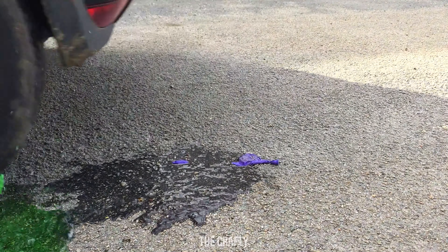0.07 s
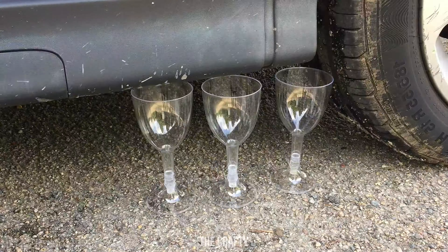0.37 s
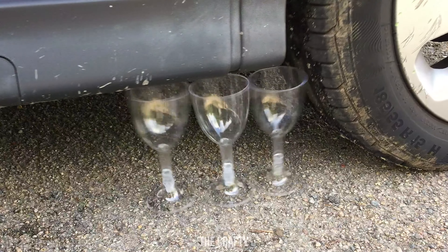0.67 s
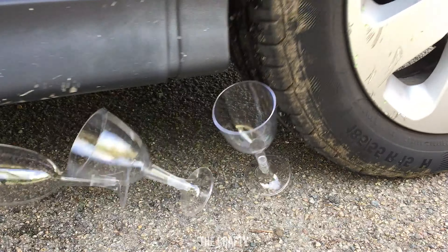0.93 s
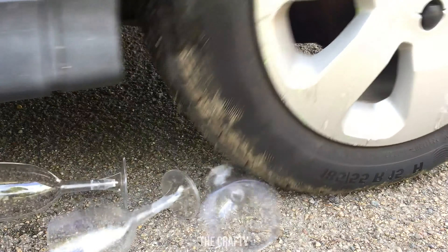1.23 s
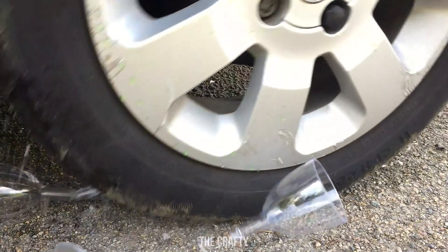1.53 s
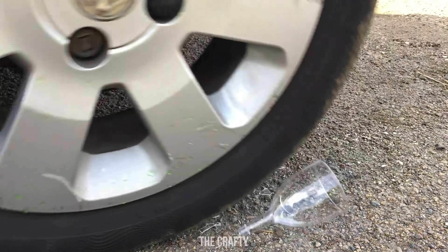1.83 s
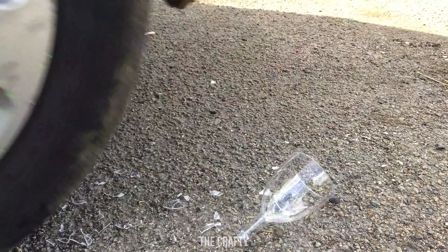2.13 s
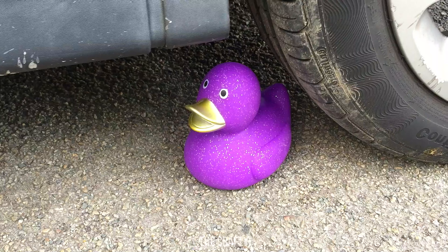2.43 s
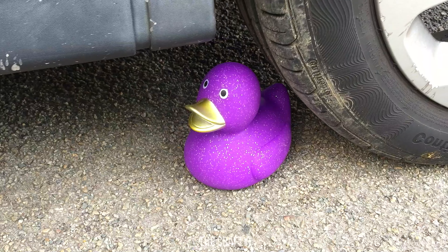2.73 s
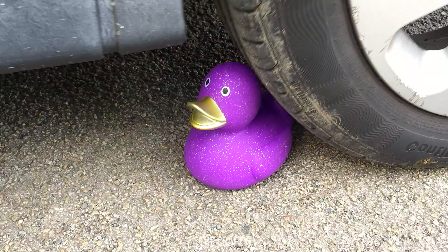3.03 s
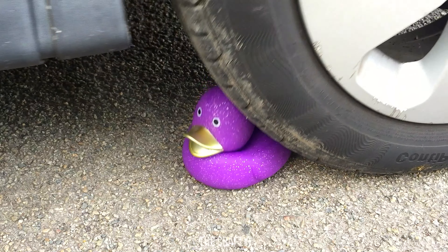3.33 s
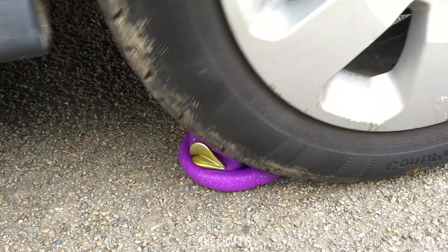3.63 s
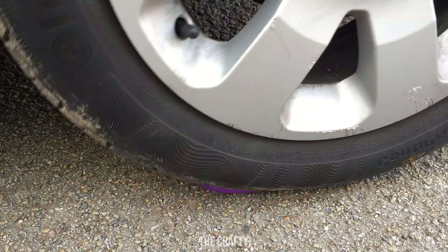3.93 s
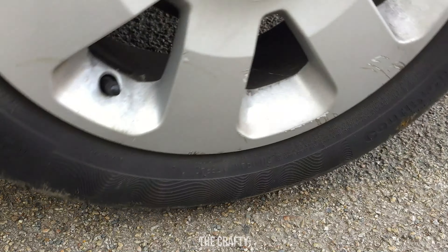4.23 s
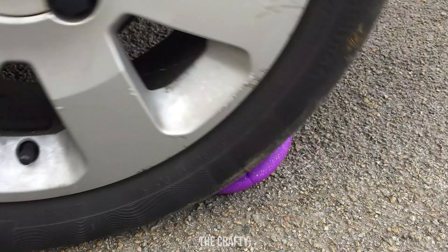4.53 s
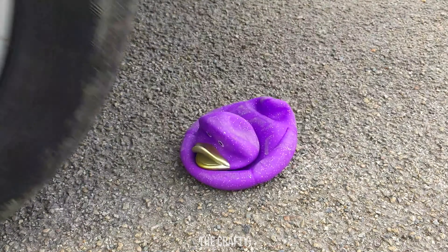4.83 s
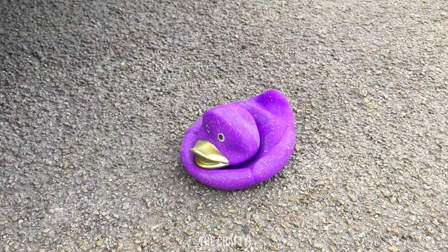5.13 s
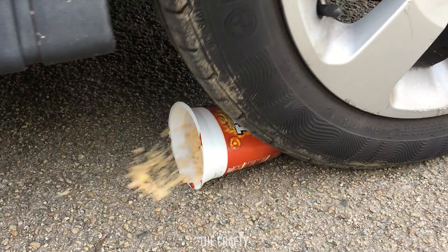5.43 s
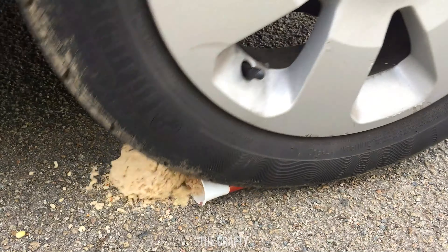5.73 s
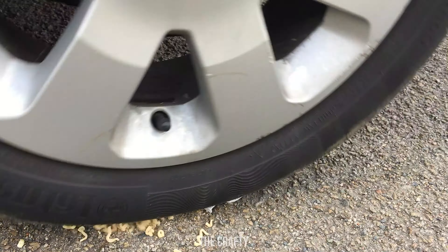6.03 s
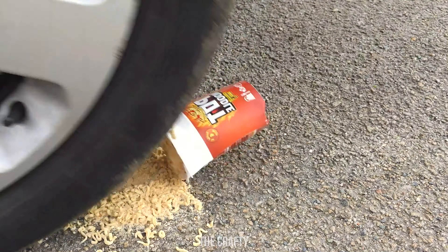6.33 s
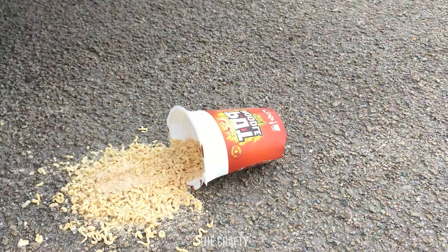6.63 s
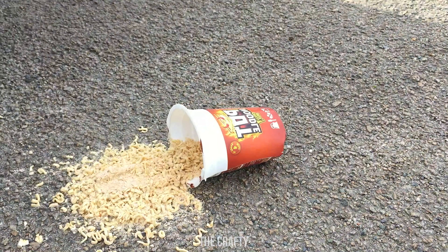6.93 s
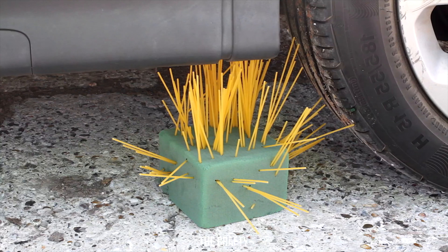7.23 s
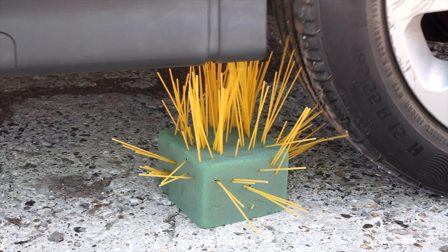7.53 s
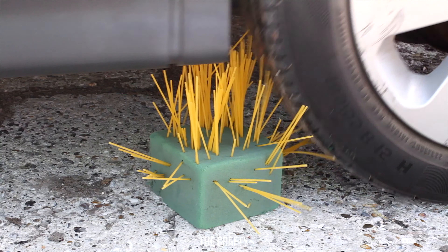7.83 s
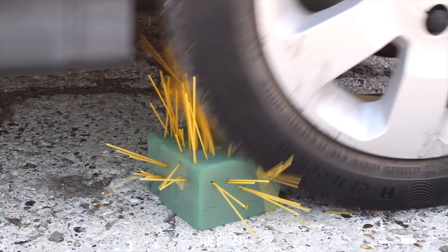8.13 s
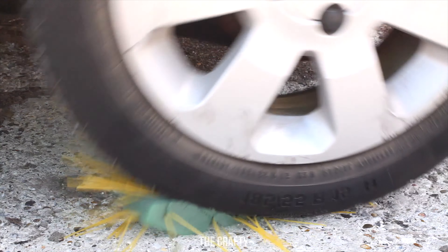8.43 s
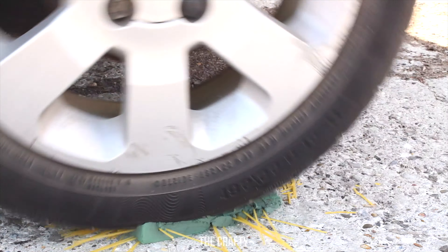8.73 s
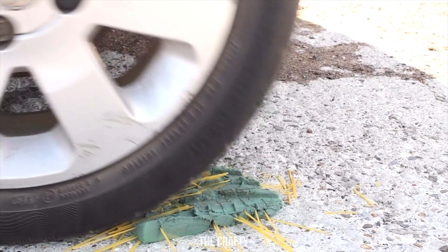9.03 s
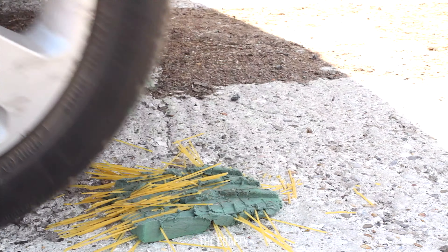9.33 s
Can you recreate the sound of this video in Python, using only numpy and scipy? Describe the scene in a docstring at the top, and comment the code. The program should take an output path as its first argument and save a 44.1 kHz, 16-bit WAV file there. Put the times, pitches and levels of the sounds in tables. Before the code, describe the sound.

A car tyre rolls over clinking, cracking plastic glasses, a whistling rubber duck, a crackling noodle pot and snapping spaghetti while the engine rumbles.

```python
"""A car creeps over things laid on asphalt, heard from beside the tyre, its engine idling over the grit.
First plastic wine glasses clink, topple and burst into splinters. Next a rubber duck whistles as its air
is squeezed out and sucked back in. Then a pot of dry noodles crackles, pops and springs back.
Last the engine revs hard, and spaghetti stuck in a fizzing foam block snaps and crunches."""
import sys
import numpy as np
from scipy import signal
from scipy.fft import rfft, irfft
from scipy.io import wavfile

SR = 44100
rng = np.random.default_rng(int(sys.argv[2]) if len(sys.argv) > 2 else 0)


def wav_out(sig):
    """Save sig, one row per channel (or a flat mono array), as 16-bit PCM at SR to the path in sys.argv[1]."""
    wavfile.write(sys.argv[1], SR, np.round(np.clip(np.atleast_2d(sig).T, -1, 1) * 32767).astype(np.int16))


N = 418950
TIME = np.arange(N) / SR

# mid-heavy colour of the engine clatter and the outdoor air: (frequency [Hz], relative level [dB])
CLATTER_COLOUR = [(100, -12), (300, -4.5), (450, -3), (700, 1.5), (950, -0.5), (1180, -1), (1500, -4),
                  (3500, -12), (6000, -15.5), (10000, -24), (16000, -26)]
# grit and splinters shifting under the tyre: (time [s], relative level [dB])
GRIT_LEVEL = [(0, -49), (.55, -36), (1.2, -32.5), (1.4, -43.5), (1.62, -34), (2.0, -45.5), (2.3, -47),
              (2.48, -37)]
# high modes of a glass, rung by a hard knock: (frequency [Hz], relative level [dB], t60 [s])
EDGE_MODES = [(3370, -24, 0.069), (3770, -13.5, 0.079), (3800, -36, 0.049), (5540, -8.5, 0.045),
              (6800, -10.5, 0.048)]


def from_db(db):
    """Decibels to gain."""
    return 10 ** (np.asarray(db) / 20)


def rms_one(x):
    """Scale to unit rms."""
    return x / np.sqrt(np.mean(x ** 2) + 1e-20)


def in_time(*tables):
    """Each column after time in the joined tables, as a curve over all samples."""
    times, *columns = np.vstack(tables).T
    return [np.interp(TIME, times, column) for column in columns]


def during(rows):
    """A gate, open from the first row's time to the last, with 4 ms fades."""
    return np.clip(np.minimum(TIME - rows[0][0], rows[-1][0] - TIME) / .004 + 1, 0, 1)


def drift(rate_hz, size=N):
    """A smooth random wander of about unit rms."""
    pole = np.exp(-40 * np.pi * rate_hz / SR)
    noise = rng.standard_normal(size // 20 + 2002)
    slow = signal.lfilter([1], [1, -2 * pole, pole * pole], noise)[2000:]
    return np.interp(np.arange(size) / 20, np.arange(len(slow)), rms_one(slow))


def coloured(x, spectrum, size=4096):
    """Minimum-phase EQ of unit energy, shaped by rows of (frequency [Hz], relative level [dB])."""
    hz, db = np.transpose(spectrum)
    grid_hz = np.maximum(np.arange(size // 2 + 1) * SR / size, 1)
    gain = from_db(np.interp(np.log(grid_hz), np.log(hz), db))
    cepstrum = irfft(np.log(gain))
    cepstrum[1:size // 2] *= 2
    cepstrum[size // 2 + 1:] = 0
    response = irfft(np.exp(rfft(cepstrum)))
    return signal.oaconvolve(x, response / np.linalg.norm(response))[:N]


def add(track, s, sound):
    """Mix a short sound in at time s."""
    start = int(s * SR)
    track[start:start + len(sound)] += sound[:N - start]


def decay(t60):
    """A quarter second of exponential decay."""
    return from_db(-60 * TIME[:SR // 4] / t60)


def ring(hz, t60):
    """One struck mode."""
    return np.sin(2 * np.pi * hz * TIME[:SR // 4]) * decay(t60)


def crack(t60, tail_db, tail_t60, rise_s=.00025):
    """A sharp burst with a weaker tail scattered under the car."""
    attack = 1 - np.exp(-TIME[:SR // 4] / rise_s)
    return rng.standard_normal(SR // 4) * attack * (decay(t60) + from_db(tail_db) * decay(tail_t60))


def grains(per_s, spread_db, clump_db):
    """Tiny fractures of uneven size that come in clumps; rms 1."""
    sizes = from_db(spread_db * np.minimum(rng.exponential(1, N), 4)) * rng.choice([-1, 1], N)
    hits = rng.random(N) < per_s / SR
    return rms_one(sizes * hits * from_db(clump_db * drift(18)))


def surge(s, rise_s, fall_s, drop_db=20):
    """A swell that peaks at s and is drop_db down at the ends of its rise and fall."""
    distance = np.maximum((s - TIME) / rise_s, (TIME - s) / fall_s)
    return from_db(-drop_db * np.minimum(distance, 10))


def whistle(rows, waver, flutter_db):
    """A gliding tone that wavers in pitch and flutters in level."""
    s, hz, db = np.transpose(rows)
    t = TIME[int(s[0] * SR):int(s[-1] * SR)]
    pitch_hz = np.interp(t, s, hz) * (1 + waver * drift(490, size=len(t)))
    phase = 2 * np.pi * np.cumsum(pitch_hz) / SR
    fade = np.clip(np.minimum(t - s[0], s[-1] - t) / .003, 0, 1)
    level = from_db(np.interp(t, s, db) + flutter_db * drift(105, size=len(t)))
    tone = np.zeros(N)
    add(tone, s[0], np.sqrt(2) * np.sin(phase) * fade * level)
    return tone


def outdoors():
    """A faint, steady bed of outdoor air."""
    return from_db(-53.5) * coloured(rng.standard_normal(N), CLATTER_COLOUR)


def exhaust_orders(phase, firing_hz, upper_db, half_db, hop=64):
    """Whole and half multiples of the firing tone, each coloured by the pipe as it sweeps through."""
    # the exhaust's resonances: (frequency [Hz], gain [dB])
    pipe_response = [(24, -34.5), (40, 5.5), (60, -6), (72, -8.5), (85, -5.5), (110, -7.5), (160, 2),
                     (220, -6), (320, -3), (600, -4)]
    pipe_hz, pipe_db = np.transpose(pipe_response)
    fall_db_per_octave = 12.5
    firing_hz, upper_db, half_db = (curve[::hop] for curve in (firing_hz, upper_db, half_db))
    tones = 0
    for order in np.r_[1, 3:15] / 2:
        db = upper_db - fall_db_per_octave * max(np.log2(order / 2), 0)
        if order % 1:  # unequal cylinders add half orders
            db = db + half_db
        db = db + np.interp(np.log(order * firing_hz), np.log(pipe_hz), pipe_db)
        amplitude = np.repeat(np.sqrt(2) * from_db(db), hop)[:N]
        tones = tones + amplitude * np.cos(order * phase + order * order)
    return tones * from_db(2.3 * drift(20))


def engine():
    """Exhaust tones and growl, with rumble and clatter that throb at each firing."""
    # engine speed and heard level for each pass; the level ducks under the bursting glasses, then recovers:
    # (time [s], firing rate [Hz], level above idle [dB], firing tone [dB])
    speed_and_level = [
        [(0, 40, -18, -43), (.15, 41.5, -2.5, -39), (.42, 38, -5.5, -47)],
        [(.44, 48, 4, -39.5), (1.25, 50, 2, -39), (1.35, 47, -26, -68), (2.0, 45, -26, -67),
         (2.48, 45, -6.5, -43)],
        [(2.5, 46, -2.5, -41), (2.95, 57.3, -1.5, -38), (3.5, 51, -9, -48.5), (3.8, 42.5, -0.5, -46),
         (4.0, 57.5, 5, -29), (4.2, 67.6, 4.5, -44.5), (4.5, 86, 0.5, -37.5), (4.78, 70.5, 3, -40),
         (4.95, 62, -6, -56)],
        [(5.22, 39, -1.5, -56), (5.85, 42.5, 2, -46), (6.15, 69, 6.5, -41), (6.45, 61, 4, -35),
         (6.75, 63.5, 3, -32), (7.02, 62.5, 3, -33)],
        [(7.04, 32, 14, -48), (7.25, 47.6, 19, -26), (7.412, 63.6, 20, -29), (7.53, 80.4, 22, -31),
         (7.662, 100, 23, -27.5), (7.766, 106, 18.5, -29), (7.895, 102, 16, -22), (7.95, 113, 0, -34),
         (8.12, 83, 0, -49), (8.39, 73, 1.5, -43), (8.7, 45.8, 1, -38), (9.5, 35.8, 10.5, -36)],
    ]
    # the balance at idle, each pass heard from its own spot:
    # (start [s], upper orders [dB], half orders against whole ones [dB], rumble [dB], clatter [dB])
    idle_mix = [(0, -34, -4.5, -50, -45.5), (.43, -37, -23, -51, -48.5), (2.49, -43, 1, -50.5, -52),
                (5.209, -45, -0.5, -48, -76), (7.031, -38.5, -56, -38, -38.5)]
    # ring of the pipe and the space under the car: (frequency [Hz], relative level [dB])
    growl_colour = [(150, -25.5), (300, 0), (400, -1), (500, 3.5), (590, -1.5), (680, 6), (760, -1),
                    (850, 3.5), (1100, -3), (2000, -11), (5000, -41.5)]
    # the engine's low end: (frequency [Hz], relative level [dB])
    rumble_colour = [(20, -20), (45, -7), (90, -3.5), (170, 1), (280, 0.5), (450, -20), (1000, -38.5),
                     (4000, -77)]
    growl_follows, rumble_follows, clatter_follows = 1.36, .63, .56  # dB per dB of engine level
    idle_hz, deep_hz = 50, 83
    firing_spread_db, clatter_db_per_octave = 2.5, 7.5

    firing_hz, level_db, tone_db = in_time(*speed_and_level)
    passes = np.array(idle_mix)
    current_pass = np.searchsorted(passes[1:, 0], TIME)
    upper_db, half_db, rumble_db, clatter_db = passes[current_pass, 1:].T
    firings = np.cumsum(firing_hz * (1 + .0045 * drift(11))) / SR
    phase = 2 * np.pi * firings
    throb = np.cos(phase)
    tone = np.sqrt(2) * from_db(tone_db) * throb

    # exhaust pulses harden faster than the engine's level rises
    pulses = np.diff(np.floor(firings), prepend=0)
    pulses = rms_one(pulses * from_db(firing_spread_db * rng.standard_normal(N)))
    growl = from_db(-59 + growl_follows * level_db) * coloured(pulses, growl_colour)

    # the deepest rumble ignores the engine's swings in level
    low_noise = coloured(rng.standard_normal(N) * (1 + .22 * throb), rumble_colour)
    deep = signal.sosfilt(signal.butter(4, deep_hz, "low", fs=SR, output="sos"), low_noise)
    body = signal.sosfilt(signal.butter(4, deep_hz, "high", fs=SR, output="sos"), low_noise)
    rumble = from_db(rumble_db) * (from_db(-2.5) * deep + from_db(rumble_follows * level_db) * body)

    speed_db = clatter_db_per_octave * np.log2(firing_hz / idle_hz)
    clatter_gain = from_db(clatter_db + clatter_follows * level_db + speed_db)
    clatter = clatter_gain * coloured(rng.standard_normal(N) * (1 + .15 * throb), CLATTER_COLOUR)
    return tone + exhaust_orders(phase, firing_hz, upper_db + level_db, half_db) + growl + rumble + clatter


def tyre():
    """The tread grinds over grit and splinters and knocks dully; the wheel squeaks once."""
    # single stones and splinters clicking under the tread: (time [s], level [dB])
    stone_clicks = [(0.34, -20.5), (.369, -21), (1.634, -13), (1.893, -21), (1.898, -22), (1.941, -19),
                    (2.036, -19.5), (2.348, -16.5), (2.428, -25)]
    # the tread knocking and scuffing on the ground: (time [s], level [dB], t60 [s])
    tread_knocks = [(2.089, -41, .07), (3.571, -37, 0.068), (4.768, -26, 0.042), (5.115, -41, 0.03),
                    (5.258, -32.5, 0.031), (8.679, -29, 0.67), (8.775, -25, 0.18), (8.80, -18, 0.34),
                    (9.105, -25, 0.096), (9.129, -21.5, 0.042)]
    # a faint squeak from the wheel: (time [s], pitch [Hz], level [dB])
    wheel_squeak = [(4.2, 1175, -69), (4.24, 1190, -38), (4.28, 1200, -66), (4.34, 1190, -43),
                    (4.4, 1171, -52), (4.46, 1180, -49), (4.6, 1175, -55)]
    grit_db, = in_time(GRIT_LEVEL)
    grit = from_db(grit_db - 10) * grains(per_s=500, spread_db=3, clump_db=3)
    for s, db in stone_clicks:
        add(grit, s, from_db(db) * crack(t60=.0019, tail_db=-20, tail_t60=.046))
    grit = coloured(grit, [(300, -4), (2000, -4.5), (6000, -13), (16000, -16)])
    knocks = np.zeros(N)
    for s, db, t60 in tread_knocks:
        add(knocks, s, from_db(db) * rng.standard_normal(SR // 4) * decay(t60))
    knocks = coloured(knocks, [(100, -2), (350, 6.5), (1200, 2.5), (2500, -8.5), (6000, -63), (16000, -47)])
    return grit * during(GRIT_LEVEL) + knocks + whistle(wheel_squeak, waver=.038, flutter_db=-4.5)


def struck(modes):
    """Each knock lands on another spot and shares its strength differently among the modes."""
    spread_db, spread_pitch = 4, .009
    chance = rng.normal(0, [spread_db, spread_pitch], (len(modes), 2))
    return sum(from_db(db + uneven_db) * ring(hz * (1 + detune), t60)
               for (hz, db, t60), (uneven_db, detune) in zip(modes, chance))


def bowl_ring(hz):
    """A soft knock rings only the low modes of a glass's bowl."""
    # the bowl's modes: (ratio to its pitch, relative level [dB], t60 [s])
    bowl_modes = [(.505, -18, 0.092), (0.754, -23.5, 0.14), (1.001, -0.5, 0.11), (1.13, 1.5, 0.03),
                  (1.291, -27, 0.051), (1.42, -10, 0.018), (1.64, -11, 0.079)]
    return struck([(ratio * hz, db, t60) for ratio, db, t60 in bowl_modes])


def shard(t60, low_hz, count, top_hz=10500):
    """A piece of plastic rings with modes of its own, set by its chance shape; starts near rms 1."""
    age = TIME[:4000]
    hz = low_hz * (top_hz / low_hz) ** rng.random(count)
    strength = rms_one(rng.rayleigh(1, count)) * rng.choice([-1, 1], count) * np.sqrt(2 / count)
    return strength @ np.sin(2 * np.pi * np.outer(hz, age)) * from_db(-60 * age / t60)


def glasses():
    """Light knocks ring the bowls, which roll on; each burst cracks and lets the tyre thump down."""
    # glasses knocking together and on the ground:
    # (time [s], relative bowl ring [dB], relative contact tick [dB], bowl pitch [Hz])
    clinks = [(.577, -13.5, -44, 2084), (0.583, -19, -36, 2068), (0.629, -32, -25, 2160),
              (.668, -28, -53, 2040), (0.7, -37, -35, 2110), (.741, -27, -16.5, 2100),
              (.751, -20, -10, 2270), (0.767, -13.5, -18.5, 2095), (.805, -23, -40, 2150),
              (.824, -31, -41, 2080), (0.867, -27, -41, 2100), (0.914, -27, -30.5, 2070),
              (.945, -17, -15.5, 2080), (.968, -29, -26.5, 2025), (1.083, -22, -21.5, 2048),
              (1.115, -35, -12.5, 2040), (1.196, -33, -28, 2100), (1.216, -17.5, -13, 2060),
              (1.24, -33, -49, 2020), (1.916, -58, -29.5, 2180), (2.086, -49, -28, 2200),
              (2.111, -36.5, -29, 2200), (2.181, -36, -26.5, 2200), (2.219, -48, -27, 2190),
              (2.36, -43, -36, 2210), (2.4, -28, -22, 2210), (2.462, -49, -33, 2190)]
    # toppled glasses ringing as they roll: (time [s], level [dB])
    roll_level = [(.74, -27), (.88, -56), (1.05, -40.5), (1.25, -43)]
    # glasses bursting under the tyre: (time [s], relative crack [dB], relative thump [dB])
    bursts = [(1.2583, -2, -4), (1.2765, 0, 6), (1.284, -38, 12), (1.299, -3.5, 5), (1.309, 3, 10.5),
              (1.4575, -13, -2.5), (1.466, -10, 4), (1.4831, -8.5, 2), (1.5056, -15.5, 5.5), (1.516, -7, 7),
              (1.5393, -15, 7.5), (1.5658, -16, 4), (1.596, -19.5, -41), (1.6077, -4, 3.5),
              (1.743, -11, -3), (1.755, -14.5, -17), (1.767, -23, 7), (1.8161, -16.5, -0.5)]
    # the bright tick of hard plastic: (frequency [Hz], relative level [dB])
    tick_colour = [(300, -19.5), (1000, 3.5), (2000, -3), (3600, -4.5), (4700, -15), (5700, -5), (7000, -3),
                   (9500, -4.5), (12000, -6), (16000, -12)]
    chatter_s, fracture_spread_s, tap_low_hz = .0015, .0027, 1300
    taps, cracks, rings, thumps = np.zeros((4, N))
    age = TIME[:SR // 4]

    # a light glass chatters against what it meets, which softens the attack
    attack = 1 - np.exp(-age / chatter_s)
    for s, bowl_db, tick_db, bowl_hz in clinks:
        add(taps, s, from_db(tick_db - 6) * attack * crack(t60=.054, tail_db=-27, tail_t60=.069))
        add(rings, s, from_db(tick_db - 7.5) * shard(t60=.074, low_hz=1450, count=40))
        add(rings, s, attack * from_db(bowl_db) * bowl_ring(bowl_hz))
        add(rings, s, attack * from_db(tick_db + 4) * struck(EDGE_MODES))
    # light knocks carry little bass
    taps = signal.sosfilt(signal.butter(2, tap_low_hz, "high", fs=SR, output="sos"), taps)

    roll_db, = in_time(roll_level)
    contacts = grains(per_s=330, spread_db=2, clump_db=2)
    rolling = rms_one(signal.oaconvolve(contacts, bowl_ring(hz=2050))[:N])
    rings += from_db(roll_db) * during(roll_level) * rolling

    # the thump starts as a sharp knock and sinks to the tyre's own low note
    thump_hz = 52 + 1400 / (1 + age / .000457) ** 1.39
    thump = np.sin(2 * np.pi * np.cumsum(thump_hz) / SR) * decay(.087)
    for s, crack_db, thump_db in bursts:
        add(cracks, s, from_db(crack_db) * crack(t60=.0075, tail_db=-23, tail_t60=.06))
        for delay in fracture_spread_s * rng.random(size=3):  # smaller fractures run on
            add(cracks, s + delay, from_db(crack_db - 1.5) * crack(t60=.003, tail_db=-25, tail_t60=.085))
        add(thumps, s, from_db(thump_db - 10) * thump)
        add(rings, s, from_db(crack_db - 11.5) * struck(EDGE_MODES))
        add(rings, s, from_db(crack_db - 10) * shard(t60=.035, low_hz=2000, count=28))
    add(rings, 1.316, from_db(-16) * ring(hz=1148, t60=.13))  # a broken-off piece rings on
    return coloured(taps + cracks, tick_colour) + rings + thumps


def splinters():
    """Loose bits skitter and are pinched under the tread, each with a dry rattle and the glass's ring."""
    start_s, end_s, count = .95, 2.25, 90
    boost_db, range_db = 7.5, 14
    tinkles = np.zeros(N)
    for place, softness in rng.random((count, 2)):
        s = start_s + place * (end_s - start_s)
        db = np.interp(s, *np.transpose(GRIT_LEVEL)) + boost_db - range_db * softness
        add(tinkles, s, from_db(db) * shard(t60=.025, low_hz=1500, count=20))
        add(tinkles, s, from_db(db - 3) * struck(EDGE_MODES))
    return tinkles


def hole_whistle(glide, gain_db):
    """The duck's air hole whistles loudest near its own pitch; turbulence adds an airy fringe."""
    # the hole's response: (pitch [Hz], level [dB])
    hole_tuning = [(6200, -47), (7200, -40), (8000, -25), (8500, -17), (9700, -16), (10300, -28),
                   (11000, -34.5), (13500, -47)]
    s, hz = np.transpose(glide)
    times = np.linspace(s[0], s[-1], 60)
    pitch_hz = np.interp(times, s, hz)
    level_db = gain_db + np.interp(pitch_hz, *np.transpose(hole_tuning))
    rows = np.c_[times, pitch_hz, level_db]
    core = whistle(rows, waver=.004, flutter_db=2)
    fringe = from_db(-14) * whistle(rows, waver=.024, flutter_db=3)
    return core + fringe


def air_band(rows, width_hz):
    """Turbulence gathered in a narrow, moving resonance."""
    s, hz, db = np.transpose(rows)
    t = TIME[int(s[0] * SR):int(s[-1] * SR)]
    phase = 2 * np.pi * np.cumsum(np.interp(t, s, hz)) / SR
    noise = drift(width_hz, size=len(t)) * np.cos(phase) + drift(width_hz, size=len(t)) * np.sin(phase)
    band = np.zeros(N)
    add(band, s[0], noise * from_db(np.interp(t, s, db)))
    return band


def duck():
    """Gentle flow whistles; hard flow breaks up into a hiss that rings the shrinking hollow."""
    # long whistles, rising on the squeeze and falling on the refill: (time [s], pitch [Hz])
    squeeze_glide = [(3.188, 6910), (3.24, 8120), (3.315, 8800), (3.326, 9430), (3.37, 9950), (3.41, 11000)]
    refill_glide = [(4.78, 13900), (4.848, 11100), (4.89, 10530), (4.92, 9520), (4.953, 9510),
                    (4.976, 8620), (5.01, 8430), (5.101, 7980), (5.16, 7460), (5.226, 6070)]
    # short chirps: (time [s], length [s], start pitch [Hz], end pitch [Hz], gain [dB])
    chirps = [(3.078, 0.039, 7660, 8700, -23), (3.119, 0.061, 7400, 9150, -3.5),
              (3.999, 0.058, 9760, 9500, -21), (4.061, 0.056, 8260, 7220, -8),
              (4.364, .038, 7240, 9720, -25), (5.226, 0.07, 8250, 7560, -8)]
    # rough whistles, overblown going out and hoarse coming in: (time [s], pitch [Hz], level [dB])
    overblown = [(3.41, 10700, -42), (3.48, 11430, -42), (3.58, 13030, -28)]
    hoarse = [(4.45, 7850, -59), (4.54, 8140, -42), (4.599, 7520, -44.5), (4.661, 8350, -32.5),
              (4.715, 8560, -40.5), (4.75, 8070, -25), (4.79, 7450, -35.5), (4.85, 7000, -47)]
    # air rushing out through the hole and back in: (time [s], level [dB])
    jet_level = [(3.08, -58), (3.2, -46), (3.5, -39.5), (3.58, -27.5), (3.7, -27.5), (4.05, -40.5),
                 (4.16, -62), (4.36, -53.5), (4.47, -47), (4.82, -45.5), (5.05, -78)]
    # the hiss of that jet: (frequency [Hz], relative level [dB])
    jet_colour = [(500, -20), (1150, 1), (1550, -6), (2200, 3.5), (3400, 0), (4600, -3), (5600, 4),
                  (7700, 2.5), (9200, 5.5), (10400, -0.5), (11500, 4), (16000, -3.5)]
    # resonances of the flattening hollow, one curve each: (time [s], frequency [Hz], level [dB])
    hollow_curves = [
        [(3.2, 3400, -56.5), (3.45, 3150, -47.5), (3.63, 2200, -42), (3.74, 2853, -38), (4.0, 2690, -61)],
        [(3.3, 5550, -73), (3.66, 5740, -44.5), (3.78, 6350, -39), (4.0, 6200, -64)],
    ]
    # airy squeaks under the last whistles, one curve each: (time [s], pitch [Hz], level [dB])
    squeak_curves = [
        [(4.92, 5100, -64), (4.99, 4250, -57), (5.05, 3950, -66)],
        [(5.235, 2950, -62), (5.294, 2490, -63)],
        [(5.235, 5200, -61), (5.294, 4820, -62)],
    ]
    clear = hole_whistle(squeeze_glide, gain_db=-1) + hole_whistle(refill_glide, gain_db=-3.5)
    for s, length, start_hz, end_hz, gain_db in chirps:
        clear += hole_whistle([(s, start_hz), (s + length, end_hz)], gain_db)
    rough = sum(whistle(rows, waver=.029, flutter_db=3) for rows in (overblown, hoarse))
    jet_db, = in_time(jet_level)
    jet = from_db(jet_db) * during(jet_level) * coloured(rng.standard_normal(N), jet_colour)
    hollow = sum(air_band(rows, width_hz=300) for rows in hollow_curves)
    squeaks = sum(air_band(rows, width_hz=110) for rows in squeak_curves)
    return clear + rough + squeaks + jet + hollow


def noodle_pot():
    """The wall buckles with cracks that ring the hollow of the pot, over crumbling noodles."""
    # dents in the wall: (time [s], relative pop [dB], relative crack [dB], pop pitch [Hz])
    dents = [(5.298, -46.5, -20, 622), (5.322, -62, -15, 1400), (5.328, -63, -15, 520),
             (5.365, -37, -15.5, 1307), (5.386, -53, -18, 1110), (5.401, -33, -6, 620),
             (5.425, -46, -20, 1098), (5.493, -38, -11, 660), (5.532, -12, -1.5, 791),
             (5.559, -13, -3.5, 938), (5.565, -21, -16, 1340), (5.595, -18.5, -17, 820),
             (5.631, -20, -11.5, 1170), (5.681, -31, -18, 865), (5.699, -26, -20, 1020),
             (5.72, -28, -4, 1053), (5.74, -26, -20, 885), (5.776, -24.5, -9.5, 802),
             (5.799, -29, -17, 1092), (5.806, -32, -12.5, 1077), (5.83, -27, -17.5, 1310),
             (5.837, -27, -10, 1220), (5.8612, -13.5, 1, 1002), (5.9, -48, -26, 1100),
             (5.951, -29, -21, 942), (6.006, -37, -22, 980), (6.254, -25.5, -28, 742),
             (6.5658, -19.5, -30, 965), (6.629, -35.5, -41, 1215), (6.658, -45, -57, 719),
             (6.757, -46, -41, 1170)]
    # the hollow pop of a dent: (ratio to its pitch, relative level [dB], t60 [s])
    pop_modes = [(.62, -38, 0.071), (1, 5.5, 0.037), (1.37, 2.5, 0.031), (2.101, -7, 0.03)]
    # the whole wall popping back once free of the tyre: (frequency [Hz], level [dB], t60 [s])
    spring_back_modes = [(454, -9.5, 0.021), (786, -5.5, 0.035), (1020, -10.5, 0.024), (1266, -6.5, 0.028),
                         (1710, -44, 0.038)]
    # dry noodles giving way: (peak time [s], rise [s], fall [s], dull grind [dB], crackle [dB])
    crumbles = [(5.451, 0.08, 0.036, -25, -16), (5.579, 0.12, 0.033, -34, -40),
                (5.691, 0.1, 0.094, -23.5, -35), (5.85, 0.12, 0.4, -28.5, -26.5),
                (6.19, 0.31, 0.19, -29, -64)]
    # brittle and hollow tone colours: (frequency [Hz], relative level [dB])
    crack_colour = [(200, -5.5), (800, -39), (1800, 4.5), (3400, 5), (5000, 0), (8000, -3.5), (12000, -9),
                    (16000, -15.5)]
    hollow_colour = [(180, -16), (450, -6.5), (700, 0), (1100, -1.5), (1800, -5.5),
                     (4000, -24.5), (16000, -40.5)]
    spring_back_s, detune = 6.394, .07
    cracks, pops, crumples = np.zeros((3, N))
    for s, pop_db, crack_db, pop_hz in dents:
        add(cracks, s, from_db(crack_db + 4.5) * crack(t60=.0048, tail_db=-17.5, tail_t60=.06))
        add(crumples, s, from_db(pop_db + 8) * crack(t60=.014, tail_db=-15.5, tail_t60=.093))
        for ratio, db, t60 in pop_modes:
            hz = pop_hz * ratio * rng.uniform(1 - detune, 1 + detune)  # each dent retunes the wall
            add(pops, s, from_db(pop_db + db + 2) * ring(hz, t60))
    for k, (hz, db, t60) in enumerate(spring_back_modes):
        add(pops, spring_back_s, (-1) ** k * from_db(db) * ring(hz, t60))
    surges = np.array([surge(s, rise_s, fall_s) for s, rise_s, fall_s, _, _ in crumbles])
    grind_db, crackle_db = np.transpose(crumbles)[-2:]
    grind = (from_db(grind_db) @ surges) * grains(per_s=2000, spread_db=1.5, clump_db=4.5)
    crackle = (from_db(crackle_db) @ surges) * grains(per_s=11000, spread_db=7.5, clump_db=3)
    return coloured(cracks + crackle, crack_colour) + coloured(crumples + grind, hollow_colour) + pops


def spaghetti():
    """Single sticks snap over a crunch of many, while the foam cells collapse in a fizz."""
    # foam collapsing as the tyre's weight comes on and off: (time [s], level [dB])
    foam_level = [(7.04, -44.5), (7.46, -28.5), (7.98, -26), (8.1, -22), (8.27, -20.5), (8.42, -28),
                  (8.72, -25), (8.94, -43.5), (9.01, -51.5), (9.5, -48)]
    # single sticks breaking: (time [s], relative strength [dB], pitch [Hz])
    stick_snaps = [(7.7265, -1.5, 2978), (7.7734, 1, 1886), (7.892, -3.5, 2154), (7.9029, -2.5, 3650),
                   (7.9433, -3, 2280), (7.9463, 0, 2140), (8.004, -2.5, 2400), (8.013, -4.5, 3300),
                   (8.0364, -2.5, 3040), (8.0394, -5, 2670), (8.051, -5, 2100), (8.0686, -4, 2760),
                   (8.0756, -7, 2614), (8.1106, -2.5, 2798), (8.1897, -5, 2720), (8.269, -5.5, 3096),
                   (8.3647, -8, 3210), (8.5016, -6, 3610), (8.643, -12, 4180), (8.7701, -11, 993),
                   (8.787, -6, 1630), (8.834, -5.5, 1476), (8.863, -8.5, 3480), (8.88, -11, 1546),
                   (8.9053, -7.5, 1770), (8.9118, -10, 3070), (8.9307, -8.5, 4120), (8.9445, -7, 4400),
                   (8.992, -15, 3876)]
    # the brief ring of the broken pieces: (ratio to the snap's pitch, relative level [dB], t60 [s])
    stick_modes = [(.44, -13, .008), (1, -1, .008), (1.73, -7, .005)]
    # bundles of sticks giving way: (peak time [s], rise [s], fall [s], level [dB])
    bundles = [(7.9, 0.091, 0.042, -21), (8.04, 0.032, 0.23, -22), (8.25, 0.47, 0.54, -20),
               (8.859, 0.53, 0.12, -33.5)]
    # midrange crunch, airy fizz and crisp tick: (frequency [Hz], relative level [dB])
    crunch_colour = [(300, -2), (800, 3), (1300, 5), (2200, 3.5), (3400, 3.5), (5000, 0.5), (8000, -4.5),
                     (16000, -48)]
    fizz_colour = [(1500, -37), (4000, -9), (6500, -4.5), (9000, 0), (11500, 3), (14000, 1.5),
                   (16000, -13.5)]
    tick_colour = [(400, -16), (1500, -6.5), (3500, -12), (7000, -10.5), (16000, -13)]
    ring_growth = 1.8  # dB per dB: thick sticks snap loudly and ring, thin ones only tick
    ticks, rings = np.zeros((2, N))
    for s, snap_db, hz in stick_snaps:
        add(ticks, s, from_db(snap_db - 1.5) * crack(t60=.0063, tail_db=-17.5, tail_t60=.033))
        for ratio, db, t60 in stick_modes:
            add(rings, s, from_db(ring_growth * snap_db + db) * ring(hz * ratio, t60))
    breaking = sum(from_db(db) * surge(s, rise_s, fall_s) for s, rise_s, fall_s, db in bundles)
    crunch = breaking * coloured(grains(per_s=5000, spread_db=3, clump_db=3), crunch_colour)
    fizz_db, = in_time(foam_level)
    fizz = from_db(fizz_db) * coloured(grains(per_s=27000, spread_db=5.5, clump_db=2), fizz_colour)
    return coloured(ticks, tick_colour) + rings + (crunch + fizz) * during([(7.035,), (9.6,)])


def scene():
    """The car and the four things it runs over, in mono."""
    bed = outdoors() + engine() + tyre()
    return (bed + glasses() + splinters() + duck() + noodle_pot() + spaghetti())[None]


def record(dry):
    """The microphone port colours the sound, the loudest cracks overload it, and the top is cut."""
    # the port's faint ring: (frequency [Hz], width [Hz], added level [dB])
    port_modes = [(1148, 23, -10), (3640, 1300, -10), (5780, 710, -23)]
    # the soft clipper's ceiling, higher in the last pass, where the spaghetti snaps peak louder:
    # (time [s], ceiling [linear])
    ceiling_curve = [(7.0, .6), (7.04, .92)]
    cutoff_hz = 16000
    heard = from_db(-1.5) * dry
    for hz, width_hz, db in port_modes:
        heard += from_db(db) * signal.lfilter(*signal.iirpeak(hz, hz / width_hz, fs=SR), dry)
    ceiling, = in_time(ceiling_curve)
    clipped = heard / (1 + np.abs(heard / ceiling) ** 6) ** (1 / 6)
    return signal.sosfilt(signal.ellip(12, .1, 80, cutoff_hz, fs=SR, output="sos"), clipped)


dry = scene()
out = record(dry)
wav_out(out)
```